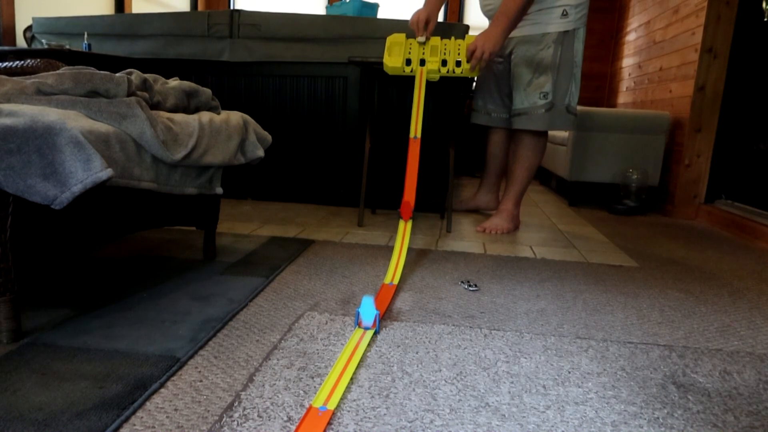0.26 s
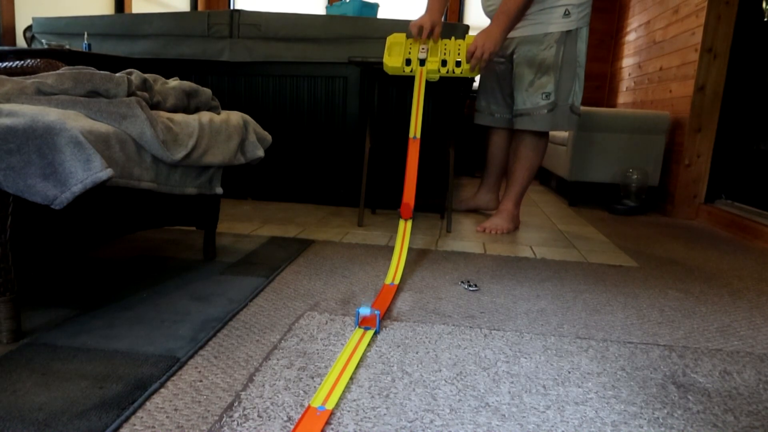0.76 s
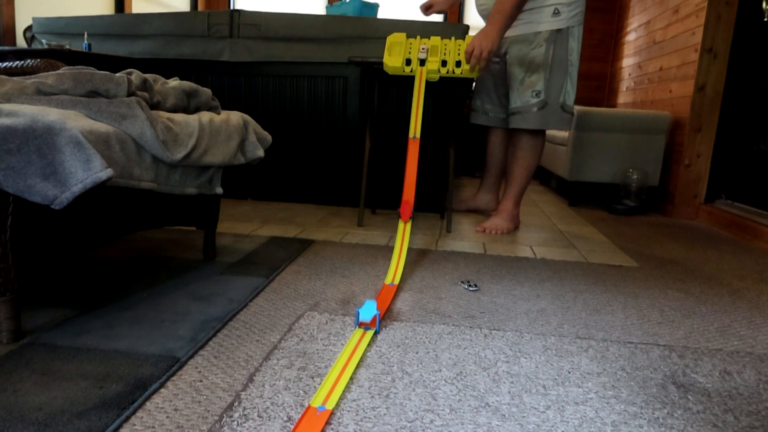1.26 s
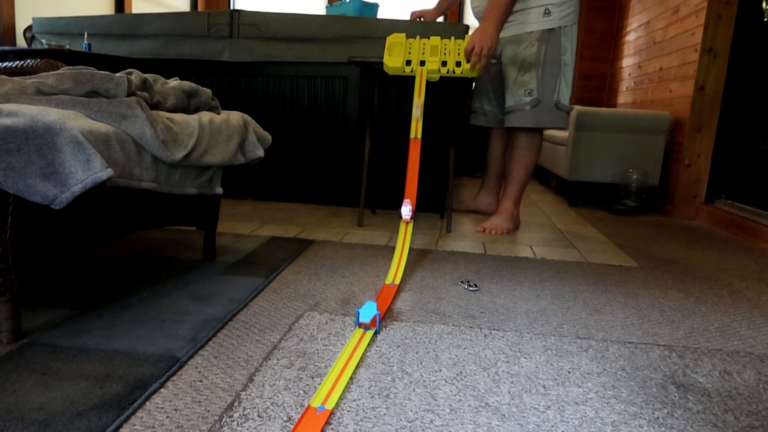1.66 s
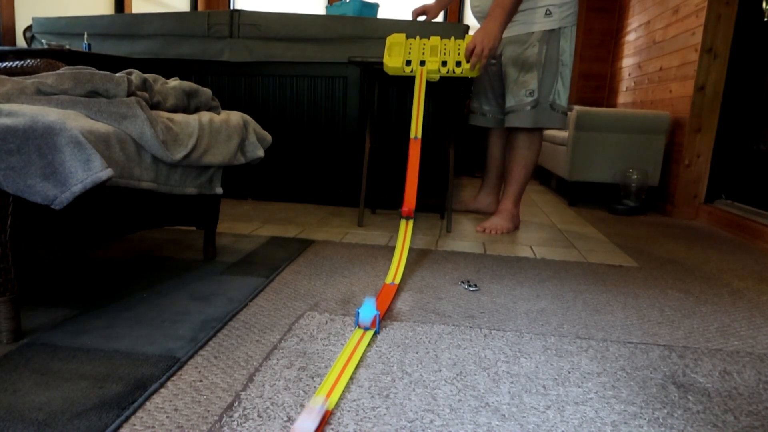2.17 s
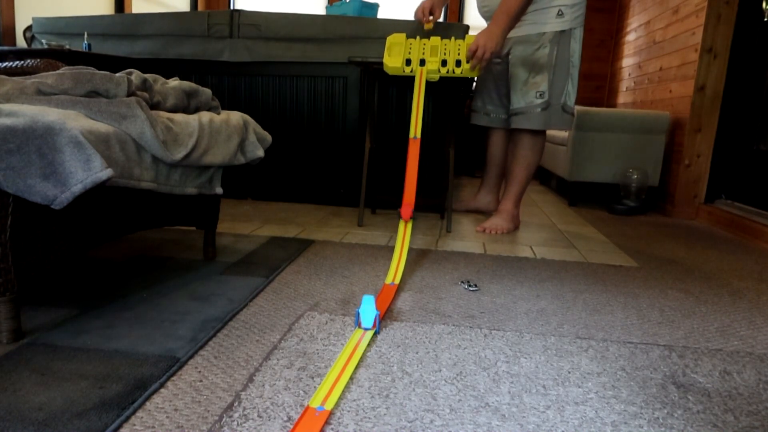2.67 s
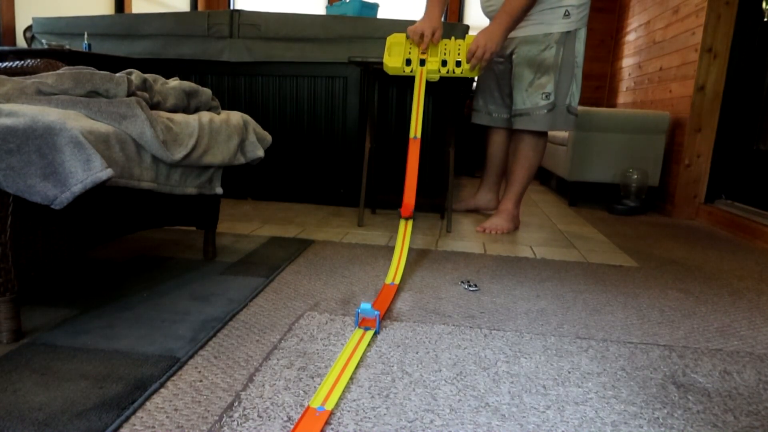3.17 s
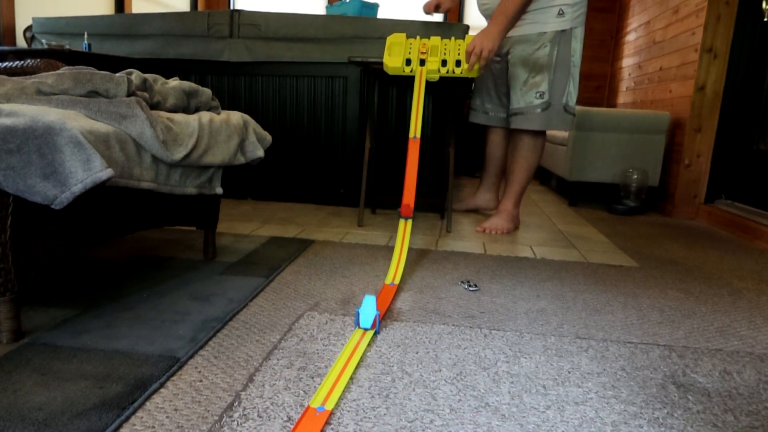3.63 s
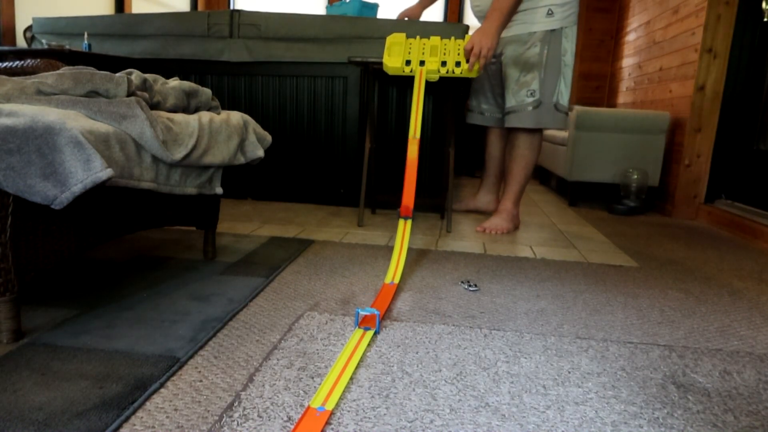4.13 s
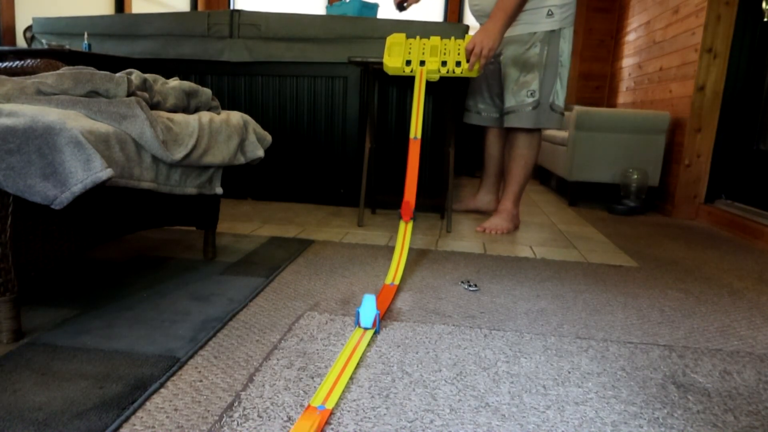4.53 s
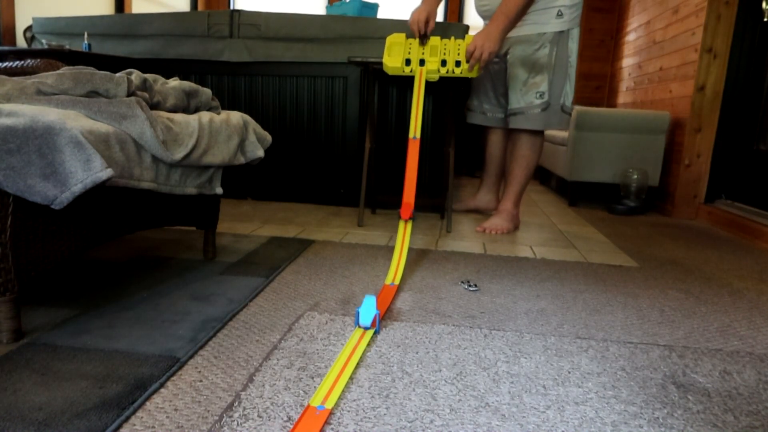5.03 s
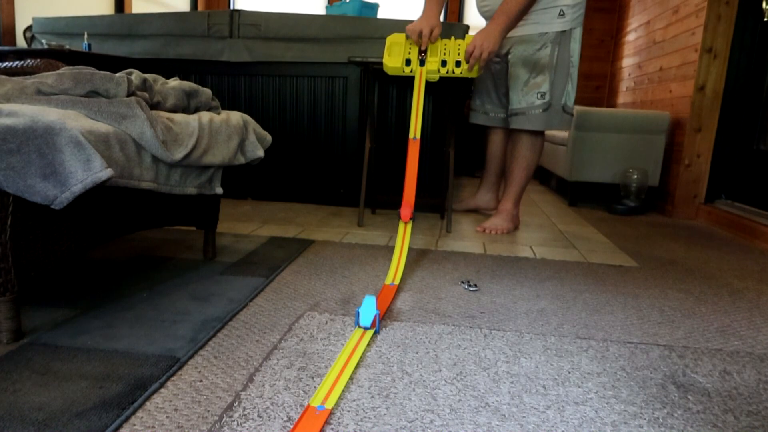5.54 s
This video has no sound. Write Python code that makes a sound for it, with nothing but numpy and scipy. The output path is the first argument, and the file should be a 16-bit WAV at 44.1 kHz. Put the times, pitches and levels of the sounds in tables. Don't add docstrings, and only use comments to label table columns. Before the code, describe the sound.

A furnished room with short echoes, faint low ventilation, appliance hum and slight microphone hiss, in stereo. A toy car's wheel rattle is already ending, gone by 0.3 s, as a lever snaps the hollow plastic gate. From 0.4 to 0.9 s a car is set in by hand: clacks, small metallic rings, soft boomy knocks. After a pause, a ringing double snap at 1.4 s releases it. Wheels chatter from 1.5 to 2.5 s, with hard cracks at 1.85 s and the loudest at 2.03 s. Another snap comes at 2.6 s, overlapping more handling clacks from 2.35 to 3.1 s, strongest near 2.7 and 2.9 s. After a quieter gap, snaps at 3.8 s start a third, longer run, 3.9 to 5.25 s, dense and bright with jolts near 4.25, 4.45 and 5.05 s. The gate snaps again at 4.85 s, then more weakly at 5.2 and 5.5 s; room hum remains.

```python
import sys
import numpy as np
from scipy import signal
from scipy.fft import rfft, irfft
from scipy.io import wavfile

SR = 44100
rng = np.random.default_rng(int(sys.argv[2]) if len(sys.argv) > 2 else 0)


def wrap_up_sound(samples):
    columns = np.atleast_2d(samples).T
    tamed = np.clip(columns, -1, 1)
    steps = np.round(tamed * 32767).astype(np.int16)
    wavfile.write(sys.argv[1], SR, steps)


def undo_db(level):
    steps = np.asarray(level, float) / 20
    return 10 ** steps


N = 255780


def rms_one(x):
    return x / np.sqrt(np.mean(x ** 2) + 1e-20)


def at_hz(points, hz):
    point_hz, value = np.array(points).T
    return np.interp(np.log(hz + 1), np.log(point_hz), value)


def coloured(x, points):
    size = x.shape[-1]
    gain = undo_db(at_hz(points, np.fft.rfftfreq(size, 1 / SR)))
    return irfft(rfft(x) * gain, size)


def resonate(x, hz, width):
    r = np.exp(-np.pi * width / SR)
    poles = [1, -2 * r * np.cos(2 * np.pi * hz / SR), r * r]
    return signal.lfilter([(1 - r * r) / 2, 0, (r * r - 1) / 2], poles, x)


def gliding(contacts, hz, width):
    turned = contacts * np.exp(2j * np.pi * rng.random(N))
    r = np.exp(-np.pi * width / SR)
    envelope = signal.lfilter([1], [1, -2 * r, r * r], turned)
    return np.real(envelope * np.exp(2j * np.pi * np.cumsum(hz) / SR))


def filtered(x, hz, kind):
    return signal.sosfilt(signal.butter(2, hz, kind, fs=SR, output="sos"), x)


def wobble(per_s):
    return np.interp(np.arange(N) / SR * min(per_s, 150), np.arange(1000), rng.standard_normal(1000))


def grains(per_s, spread_db, size):
    strength = undo_db(spread_db * np.minimum(rng.exponential(1, size), 4)) * rng.choice([-1, 1], size)
    return strength * (rng.random(size) < per_s / SR)


def rattle(rise_ms, length_ms, per_s):
    ms = np.arange(SR // 5) * 1000 / SR
    contacts = grains(per_s, 2.55, len(ms))
    contacts[0] = 1
    build_up = 1.05 - np.exp(-ms / max(rise_ms, .1))
    return contacts * build_up * np.exp(-ms / max(length_ms, 1))


def add(track, s, db, sound):
    i = round(s * SR)
    track[i:i + len(sound)] += (undo_db(db) * sound / np.abs(sound).max())[:N - i]


def rolling():
    # time in seconds, drumming of the wheels in dB, looseness of the ride in dB.
    car_runs = [
        [(0.0, -31, 3.2), (0.09, -30, -1), (0.115, -41.5, 2.5), (0.17, -43, 4), (0.2, -48, -1.5),
         (0.3, -42, 13)],
        [(1.52, -34, 9), (1.62, -40.5, -2), (1.806, -31.5, -2), (1.918, -23.5, -6), (2.02, -30, 0.1),
         (2.166, -38, 0.7), (2.284, -33.5, -0.7), (2.36, -41, -3), (2.56, -35, -8)],
        [(3.9, -25, 0.1), (3.99, -38.5, -1), (4.17, -30.5, 3.6), (4.26, -21.5, -0.6), (4.42, -29, 2.5),
         (4.61, -26.5, 2), (4.67, -29.5, -7), (4.88, -32, -12.5), (5.25, -46, -4)],
    ]
    # track in Hz, its width in Hz, axle width in Hz, hiss limit in Hz.
    car_modes = [(2820, 1000, 1300, 11400), (2600, 850, 800, 8700), (2450, 380, 750, 9300)]
    # axle rattle, wheel hiss and track body in dB re drumming.
    layer_shares = [(-1.5, -1.5, -7), (-1, -3.5, -1), (-2.9, -2, -12)]
    # axle rattle, wheel hiss and track body in dB per dB.
    looseness_drives = (1.52, .9, 1)
    # centre in Hz, swing in Hz, rocks per second, highest moment in s.
    axle_rocking = [(4000, 280, 2.6, 0.00059), (3880, 248, 9.4, 1.6), (3900, 190, 5.5, 4.222)]
    # frequency in Hz, level in dB per Hz.
    hiss_spectrum = [(2350, 10), (4000, -10), (4600, -5.5), (6590, -11.5), (11400, -19), (14600, -13.5),
                     (16000, -41)]
    out = np.zeros(N)
    t = np.arange(N) / SR
    for rows, shares, rocking, modes in zip(car_runs, layer_shares, axle_rocking, car_modes):
        s, drum_db, loose_db = np.transpose(rows)
        track_hz, track_width, axle_width, hiss_hz = modes
        levels = [drum_db]
        for share, drive in zip(shares, looseness_drives):
            levels.append(drum_db + share + drive * loose_db)
        centre_hz, swing_hz, per_s, top_s = rocking
        axle_hz = centre_hz + swing_hz * np.cos(2 * np.pi * per_s * (t - top_s))
        since_start = t - s[0] + (s[0] == 0)
        fade = np.clip(np.minimum(since_start, s[-1] - t) / 0.085, 0, 1)
        bumps = undo_db(4.2 * wobble(45))
        track, axle, tyre, body = (grains(per_s * bumps, 2.6, N) for per_s in (800, 900, 4000, 2000))
        jounce_db = 0.76 * wobble(30)
        layers = (resonate(resonate(track, track_hz, track_width), track_hz, 2.4 * track_width),
                  gliding(axle, axle_hz, axle_width),
                  filtered(coloured(tyre, [(3000, -17.0)] + list(hiss_spectrum)), hiss_hz, "low"),
                  filtered(body, [1100, 2300], "band"))
        car = 0
        for db, layer in zip(levels, layers):
            level_db = np.interp(t, s, db) - 4.5 + jounce_db + 0.56 * wobble(24.94)
            car = car + undo_db(level_db) * rms_one(layer)
        out += fade * car
    return out


def clacks():
    # start in seconds, peak in dB, ring in Hz, rattle length in ms, top in dB.
    jolt_rows = [(1.751, -25, 2970, 10, -2.1), (1.8447, -3.5, 3230, 1.6, -3), (1.848, -5.5, 3200, 18, -2),
                 (2.0268, 7.5, 4100, 6.8, 0.1), (2.0424, 2, 3740, 7.9, 4.5), (2.166, -21.5, 4090, 55, -15),
                 (4.0587, -22.5, 2420, 24, -12), (4.096, -18, 3830, 9.1, -12), (4.15, -16, 5200, 25, -4),
                 (4.2467, -10, 2600, 15, 0), (4.2616, -22, 2450, 17, 3), (4.3349, -14, 2500, 4.9, -3),
                 (4.447, -2, 2600, 1.2, -4.5), (4.454, -12, 2250, 13, -4), (4.5304, -20, 2392, 4.2, -3),
                 (4.6738, -18.5, 2500, 5.7, -4), (4.7506, -24, 2500, 34, -8), (4.9838, -24.5, 2400, 63, -7),
                 (5.0486, -5, 2360, 12, -9), (5.0641, -12.5, 2420, 9.3, 3)]
    # start in seconds, peak in dB, ring in Hz, rattle length in ms, bottom in dB.
    placing_rows = [(0.4272, -18.5, 1970, 70, -12), (0.4991, -14.5, 1910, 20, -0.5),
                    (0.5267, -8, 4860, 21, -3), (0.744, -33.5, 1720, 86, 10),
                    (0.7809, -10.5, 3150, 17, 8.5), (0.849, -17, 1740, 18.5, 5),
                    (0.8783, -19.5, 1620, 4, 22), (2.347, -14, 2670, 14, -18),
                    (2.4256, -16, 2720, 17, -1.5), (2.4997, -20, 2400, 4.8, 1), (2.686, -18, 1980, 11, -18),
                    (2.7053, -2.5, 2450, 3.7, 4.5), (2.7856, -9.5, 2840, 28, 0),
                    (2.8236, -21.5, 1490, 59, 5.5), (2.939, -5.5, 3380, 27, 2.5),
                    (3.0931, -24.5, 1490, 69, 11)]
    hard_ring_hz, top_db_per_octave = 4560, 17.5
    jolt_bottom_db, bottom_per_top = -13, -1.22
    strikes = []
    for s, db, hz, length_ms, bottom_db in placing_rows:
        top_db = top_db_per_octave * np.log2(hz / hard_ring_hz)
        strikes.append((s, db, hz, length_ms, top_db, bottom_db))
    for s, db, hz, length_ms, top_db in jolt_rows:
        strikes.append((s, db, hz, length_ms, top_db, jolt_bottom_db + bottom_per_top * top_db))
    out = np.zeros(N)
    for s, db, hz, length_ms, top_db, bottom_db in strikes:
        blow = rattle(0.25, length_ms, 4000)
        ring = 1.41 * rms_one(filtered(resonate(blow, hz, 0.31 * hz), 6014, "low"))
        click = rms_one(filtered(blow, [1500, 5500], "band"))
        top = undo_db(top_db) * rms_one(filtered(blow, [5500, 15000], "band"))
        bottom = undo_db(bottom_db) * rms_one(filtered(blow, [700, 1800], "band"))
        add(out, s, db - 1, ring + click - top - bottom)
    return out


def rings():
    # start in seconds, peak in dB, resonance in Hz, width in Hz, rattle length in ms.
    ring_rows = [(0.784, -11.5, 3100, 700, 2.6), (1.375, -36.5, 3680, 300, 6), (2.79, -23, 3900, 700, 20),
                 (1.44, -7, 1543, 160, 5.3), (2.029, -13.5, 4140, 220, 34), (0.293, -14, 1410, 260, 21),
                 (2.589, -4, 1436, 262, 4.4), (4.863, -9, 1350, 300, 9.4), (2.708, -16, 2250, 320, 12),
                 (3.805, -4, 1515, 110, 6.4), (4.4473, -7, 2230, 300, 0.82), (4.454, -9, 1980, 260, 1.2),
                 (4.752, -21.5, 2500, 400, 1.2), (4.764, -23, 2450, 250, 4), (4.818, -37, 2360, 250, 8),
                 (4.834, -21, 2380, 250, 1.5), (5.0494, -10.5, 2430, 320, 7), (5.053, -16, 1870, 260, 8),
                 (5.067, -22, 2480, 320, 2.2), (5.084, -24, 2380, 400, 7)]
    out = np.zeros(N)
    for s, db, hz, width, length_ms in ring_rows:
        blow = rattle(0.21, length_ms, 1500)
        add(out, s, db, resonate(resonate(blow, hz, width), hz, 1.4 * width))
    return out


def snaps():
    # start in seconds, peak in dB, rattle length in ms, edge in dB, crack in dB.
    snap_rows = [(0.27, -23, 15, -8, -20), (0.288, -6, 12.5, -7.5, -10.5), (1.376, -36, 9, -14, -39),
                 (1.424, -23.5, 13, -20, -13), (1.434, -6.5, 21.4, -5.5, -46), (1.482, -15, 19, -7.5, -45),
                 (2.565, -25, 11, -5, -20), (2.584, -7.5, 15.4, -6, -11.5), (3.133, -20, 14.3, -10.5, -15),
                 (3.795, -29.5, 7.7, -8, -24), (3.803, -7.5, 16.4, -1.5, -42), (3.847, -9.5, 23, -7.5, -38),
                 (4.845, -24.5, 15, -26, -12), (4.856, -7.5, 9, -5, -9.5), (5.196, -21, 34, -4.5, -23),
                 (5.476, -23.5, 11, -6, -12.5), (5.49, -26.5, 7.2, -22, -20)]
    # frequency in Hz, width in Hz, level in dB.
    gate_modes = [(740, 155, -10), (1060, 630, -1), (1208, 140, -3), (1490, 118, 3.5), (1720, 160, 1),
                  (1872, 120, -22), (2720, 450, -18), (91, 82, -9), (201, 240, -14.5), (400, 240, -6.5)]
    out = np.zeros(N)
    for s, db, length_ms, edge_db, crack_db in snap_rows:
        blow = rattle(0.34 * length_ms, length_ms, 4000)
        chance_db = rng.normal(0, 5.5, len(gate_modes))
        modes = 0
        for (hz, width, mode_db), extra_db in zip(gate_modes, chance_db):
            modes = modes + undo_db(mode_db + extra_db) * resonate(blow, hz, width)
        body = rms_one(filtered(modes, 2220, "low"))
        body = body + undo_db(-3.5) * rms_one(filtered(blow, [600, 2300], "band"))
        edge = undo_db(edge_db) * rms_one(filtered(blow, [2000, 6200], "band"))
        crack = undo_db(crack_db) * rms_one(filtered(blow, [6200, 14500], "band"))
        add(out, s, db + 5.0, body - edge + crack)
    return out


def knocks():
    # start in seconds, peak in dB, pitch in Hz, rattle length in ms, boom in dB.
    knock_rows = [(.13, -35.5, 320, 37, -29), (0.454, -21.5, 460, 4.5, -6.5), (.529, -21, 540, 3.9, -9.5),
                  (.537, -13, 470, 6.3, -0.6), (.557, -25, 620, 4.1, -1), (1.525, -24, 320, 9.9, -10),
                  (1.842, -31.5, 616, 17, -9), (2.039, -23.5, 680, 10, -15.5), (2.709, -18, 347, 8, 6.5),
                  (2.718, -23.5, 445, 9.9, -26), (2.821, -33, 99, 18, -8), (2.942, -22, 680, 26, -10),
                  (3.945, -29, 323, 11, -4.5), (4.654, -36.5, 480, 15, 2), (4.756, -40, 237, 30, -17),
                  (4.879, -27.5, 470, 24, -4.5), (5.21, -34, 636, 15, -5.5)]
    out = np.zeros(N)
    for s, db, hz, length_ms, boom_db in knock_rows:
        width = 0.51 * hz
        blow = filtered(rattle(1.1, length_ms, 900), [0.28 * hz, 900], "band")
        hollow = rms_one(resonate(resonate(blow, hz, width), hz, 3 * width))
        boom = resonate(blow, 189, 85) - 0.71 * resonate(blow, 368, 120)
        upper = undo_db(-8.0) * rms_one(resonate(blow, 720, 300))
        add(out, s, db + 8, hollow + undo_db(boom_db) * rms_one(boom) - upper)
    return out


def room(x):
    # frequency in Hz, reverberation time in seconds.
    decay_times = [(100, 0.34), (400, 0.25), (1500, 0.3), (4000, 0.31), (10000, 0.08)]
    t = np.arange(SR // 2) / SR
    edges = 40 * 2 ** np.arange(8.)
    density = np.clip(t / 0.035, .03, 1)
    present = rng.random((2, len(t))) < density
    echoes = rng.standard_normal((2, len(t))) * present / np.sqrt(density) * (t > .0015)
    bands = [filtered(echoes, [low, 2 * low], "band") for low in edges[:-1]]
    bands.append(filtered(echoes, edges[-1], "high"))
    response = 0
    for k, band in enumerate(bands):
        decay = undo_db(-60 * t / at_hz(decay_times, edges[k]))
        response = response + (-1) ** k * band * decay
    response /= np.sqrt(np.sum(response ** 2, axis=1, keepdims=True))
    return signal.fftconvolve(x[None], response, axes=1)[:, :N]


def background():
    # frequency in Hz, level in dB per Hz.
    air_spectrum = [(15, -25), (25, -8.5), (64, 0), (200, -8.5), (550, -12), (840, -11.5), (1190, -15.5),
                    (16000, -52.5)]
    # frequency in Hz, level in dB per Hz.
    capsule_spectrum = [(2500, -8.5), (4500, 4.5), (6700, -3), (9000, -7), (12000, -25), (16000, -33)]
    # frequency in Hz, rms level in dB.
    hum_tones = [(59.2, -50.5), (253.0, -55), (344.5, -59.5), (430.7, -59.5), (586.8, -54.5),
                 (861.3, -58.5)]
    air_db, capsule_db = -40, -66
    air = undo_db(air_db - 3.5) * rms_one(coloured(rng.standard_normal((2, N)), air_spectrum))
    air += undo_db(capsule_db) * rms_one(coloured(rng.standard_normal((2, N)), capsule_spectrum))
    for hz, db in hum_tones:
        tone = resonate(resonate(rng.standard_normal(N), hz, 11.2), hz, 11.2)
        air[0] += undo_db(db) * rms_one(tone)
    return air


def scene():
    # frequency in Hz, side minus mid in dB.
    side_spectrum = [(20, -40), (200, -6.5), (380, -5), (700, -11), (1290, -13.5), (2380, -7.5), (8120, 6),
                     (15000, 11.5)]
    room_db = -4.5
    cars = rolling()
    place = np.pi / 2 * wobble(7.7)
    sources = (snaps() + knocks(), clacks() + rings(), cars * np.cos(place), cars * np.sin(place))
    wet = sum(room(x) for x in sources)
    air = background()
    mid = sources[0] + sources[1] + undo_db(3.5) * cars + undo_db(room_db) * wet[0] + air[0]
    side = coloured(undo_db(room_db - 4) * wet[1] + air[1], side_spectrum)
    return np.array([mid + side, mid - side])


def low_pass(x):
    return signal.sosfilt(signal.butter(12, 16500, fs=SR, output="sos"), x)


def record(dry):
    steep = signal.cheby2(10, 50, 16200, fs=SR, output="sos")
    rounded = 0.97 * np.tanh(dry / 1.159)
    mix = signal.sosfilt(steep, rounded)
    return low_pass(mix)


dry = scene()
out = record(dry)
wrap_up_sound(out)
```